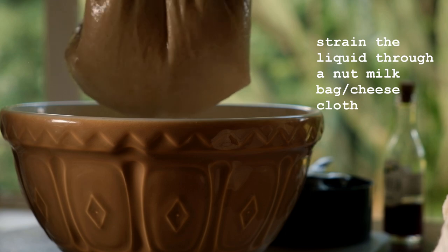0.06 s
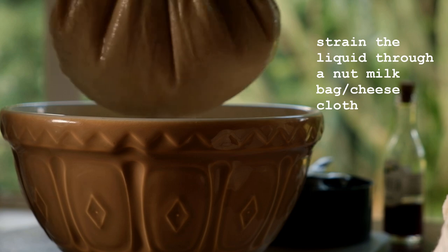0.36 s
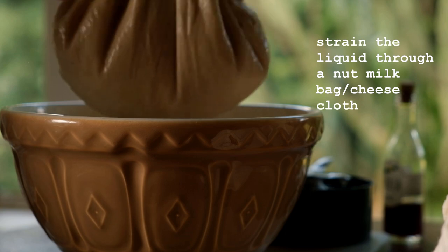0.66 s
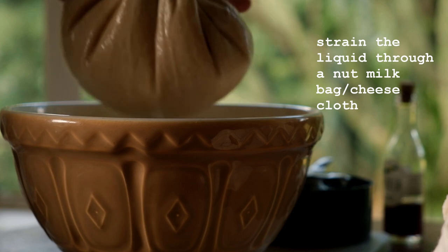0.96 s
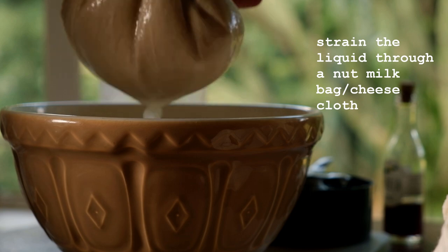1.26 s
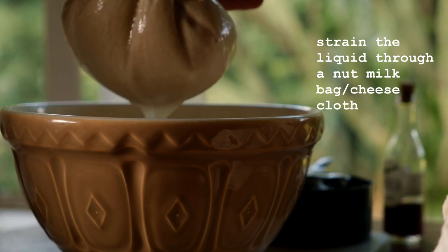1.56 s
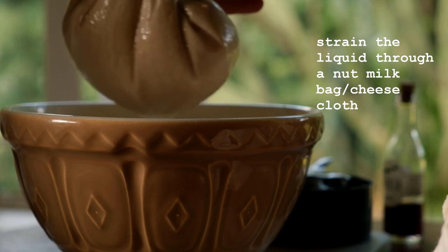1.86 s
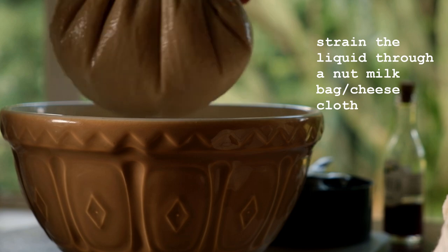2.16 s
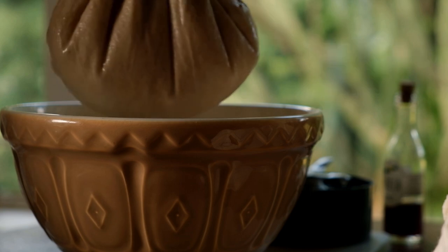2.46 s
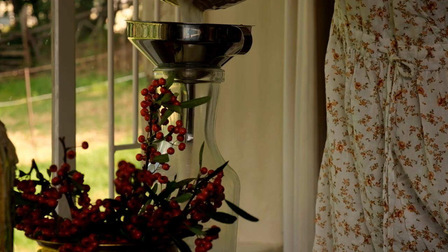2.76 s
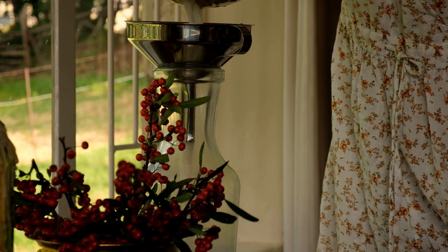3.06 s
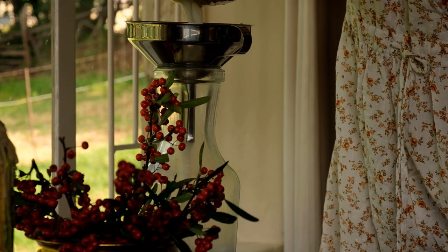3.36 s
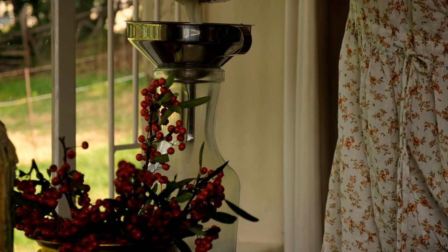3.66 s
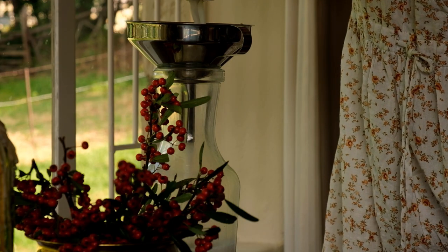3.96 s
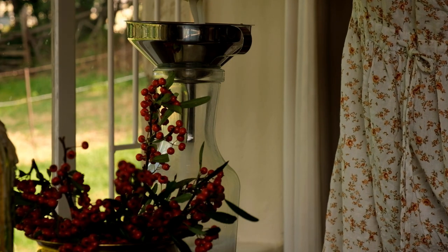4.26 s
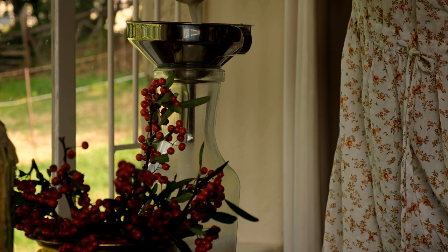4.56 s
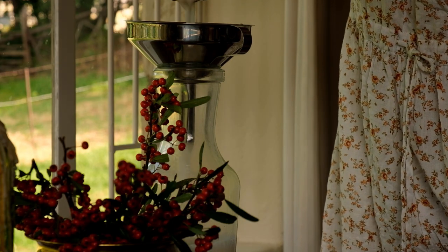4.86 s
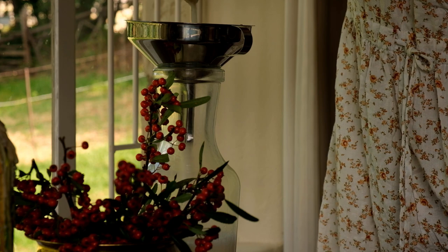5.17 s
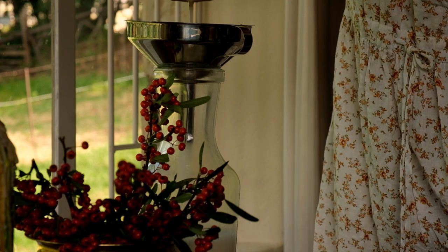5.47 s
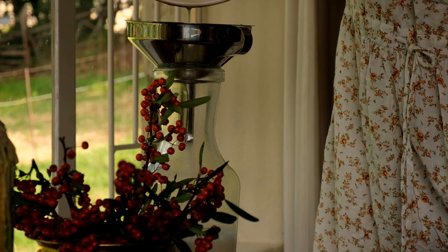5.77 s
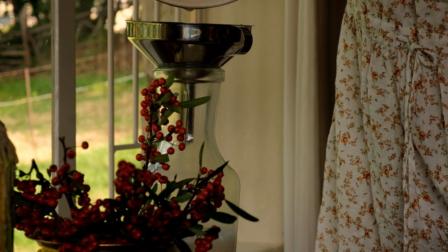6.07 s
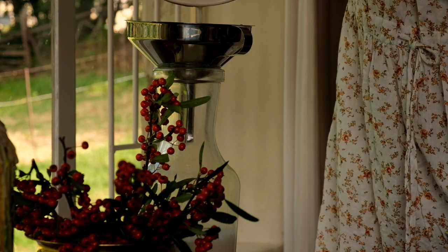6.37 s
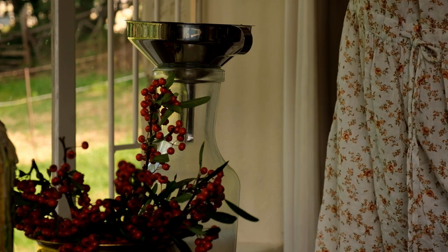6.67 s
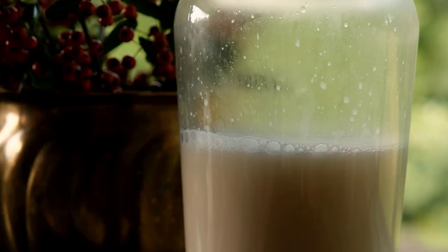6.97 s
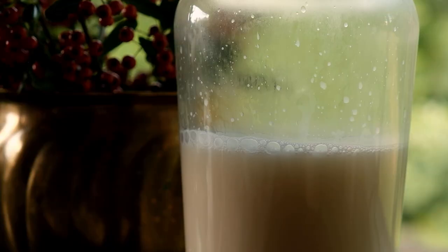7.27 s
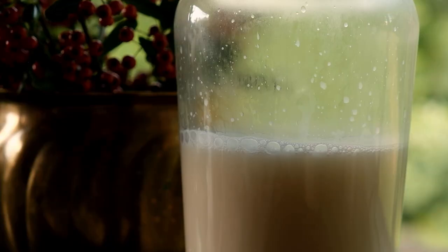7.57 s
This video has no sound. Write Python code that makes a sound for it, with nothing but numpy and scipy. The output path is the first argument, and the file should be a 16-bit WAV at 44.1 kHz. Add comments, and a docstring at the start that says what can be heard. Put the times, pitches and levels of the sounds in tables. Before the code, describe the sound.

Milk drips and squelches from a wrung cloth bag into a bowl, then gurgles through a funnel into a bottle and stops abruptly.

```python
"""Drops plink into a ceramic bowl and wet cloth squelches, close by, as nut milk is wrung from a bag.
Then the milk is poured through a steel funnel into a glass bottle: trapped air gulps and small
bubbles fizz over a low rumble. The stream thins to a few last drops and stops abruptly,
leaving the microphone in a quiet kitchen with insects far outside."""
import sys
import numpy as np
from scipy import signal
from scipy.io import wavfile

SR = 44100
rng = np.random.default_rng(int(sys.argv[2]) if len(sys.argv) > 2 else 0)


def generate_wav(signal):
    """Clip the signal to [-1, 1] and save it as 16-bit WAV at the path in sys.argv[1]."""
    frames = np.transpose(np.atleast_2d(signal))
    scaled = np.clip(frames, -1, 1) * 32767
    pcm = np.round(scaled).astype(np.int16)
    wavfile.write(sys.argv[1], SR, pcm)


N = 340011
TIME = np.arange(N) / SR
POUR_START_S, POUR_END_S = 2.66, 6.903
CUTOFF_HZ, SQUISH_HZ = 16000, 3670

# Big gulps of air dragged under in the funnel. Each row: start in seconds, level in dB,
# pitch of the air pocket in Hz, extra ring of the bare steel in dB.
GULPS = [(2.684, -26, 187, 12.5), (2.751, -31.5, 223, 17.5), (2.853, -35.5, 164, 19),
         (2.949, -30, 160, 15.5), (3.157, -25.5, 523, 3.5), (3.253, -22.5, 163, 4), (3.368, -19.5, 335, 0),
         (3.5, -24, 370, 12), (3.522, -39, 1000, 16), (3.568, -23.5, 534, 6.5), (3.652, -29, 497, -3),
         (3.778, -29.5, 169, -3), (3.852, -21.5, 290, 3.5), (3.954, -18, 561, -2.5), (4.003, -22, 222, 1),
         (4.117, -28.5, 507, -5), (4.169, -24, 500, -5), (4.241, -19, 536, -23), (4.321, -24, 513, -19),
         (4.386, -20, 567, -3), (4.455, -24, 537, -7), (4.662, -25.5, 544, -4), (4.696, -31, 375, 8),
         (4.883, -29.5, 527, -14), (4.958, -24.5, 370, 9.5), (5.22, -21.5, 422, 4),
         (5.255, -20.5, 457, -10), (5.314, -22, 510, -4), (5.346, -26.5, 482, 2), (5.677, -29.5, 527, -14),
         (5.838, -33, 530, 6.5)]
# The course of the pour. Each row: time in seconds, churning level in dB, fizz level in dB.
POUR_LEVELS = [(2.66, -48.5, -57.5), (3.13, -54.5, -52.5), (3.5, -45.5, -63.5), (3.95, -50.5, -53.5),
               (4.4, -45.5, -53.5), (4.75, -49.5, -56.5), (5.1, -46, -53), (5.53, -46, -52),
               (5.66, -51, -60), (5.82, -42.5, -65), (6.05, -63, -65.5), (6.9, -63.5, -69.5)]
# Steady hollow resonances ringing under the pour and last drops.
# Each row: pitch in Hz, level in dB, time to fall 60 dB in seconds.
HOLLOW_MODES = [(242.2, -0.5, 0.35), (333, -0.5, 0.12), (469, -13, 0.17), (530.6, -11.5, 0.15)]


def from_db(db):
    """Decibels to gain."""
    return 10 ** (np.asarray(db) / 20)


def unit_rms(x):
    """Scale to unit power."""
    return x / np.sqrt(np.mean(x ** 2) + 1e-20)


def gains(rows):
    """One gain curve over time for each dB column of a table."""
    times, *columns = np.transpose(rows)
    return [from_db(np.interp(TIME, times, db)) for db in columns]


def db_at(spectrum, hz):
    """Read a spectrum on a log-frequency axis."""
    known_hz, db = np.transpose(spectrum)
    return np.interp(np.log(hz), np.log(known_hz), db)


def band(x, edges_hz, kind="band"):
    """Gentle Butterworth filter."""
    sos = signal.butter(2, np.minimum(edges_hz, .45 * SR), kind, fs=SR, output="sos")
    return signal.sosfilt(sos, x + 1e-18)


def add(out, start_s, sound):
    """Mix a short sound in at a given time."""
    i = max(round(start_s * SR), 0)
    out[i:i + len(sound)] += sound[:N - i]


def ping(hz, t60, rise_s, glide=0, samples=SR // 10):
    """A damped sine that swells briefly; its pitch climbs by `glide` times `hz` each second."""
    t = TIME[:samples]
    tone = np.sin(2 * np.pi * hz * t * (1 + glide * t / 2))
    return tone * from_db(-60 * t / t60) * (1 - np.exp(-t / rise_s))


def background():
    """Room tone and a thin band of far insects, both louder until the pour ends; a drone under the pour."""
    # Room tone. Each row: frequency in Hz, relative level in dB.
    spectrum = [(25, 0), (160, -11.5), (820, -12), (1700, -23.5), (2550, -10), (3100, -24), (16000, -37)]
    tone, edges = 0, np.geomspace(20, CUTOFF_HZ, 20)
    for low, high in zip(edges, edges[1:]):
        mid, side = band(rng.standard_normal((2, N)), [low, high])
        stereo = mid + from_db(-1.5) * side * [[1], [-1]]
        tone = tone + from_db(db_at(spectrum, np.sqrt(low * high))) * stereo
    insects = unit_rms(band(rng.standard_normal((2, N)), [2440, 2620]))
    stages = [TIME < POUR_START_S, TIME < POUR_END_S]
    tone_db = np.select(stages, [-57, -55], -68)
    insects_db = np.select(stages, [-64, -61], -77)
    # Low rumble. Each row: time in seconds, level in dB.
    rumble_levels = [(2.66, -53.5), (5.1, -49.5), (6.25, -51), (6.35, -60)]
    waver = 0.48 * unit_rms(band(rng.standard_normal(N), [34, 52]))
    drone = np.sin(2 * np.pi * 42 * TIME) + waver
    rumble = gains(rumble_levels)[0] * drone * (TIME > POUR_START_S) * (TIME < POUR_END_S)
    return from_db(tone_db) * unit_rms(tone) + from_db(insects_db) * insects + rumble


def kitchen(x, scatter_db, room_db, room_t60, wide_hz):
    """The microphone hears direct sound, near echoes, treble scattered by curved walls and a room tail."""
    # Echoes off the vessel's wall and the worktop. Each row: delay in seconds, level in dB.
    echoes = [(.0083, -12), (0.0144, -16)]
    t = TIME[:SR // 2]
    mid, side = rng.standard_normal((2, len(t))) * from_db(-60 * t / room_t60) * (t > echoes[0][0] / 2)
    width = band(side, wide_hz, "high") * [[1], [-1]]   # the bass stays centred
    tail = from_db(room_db) * (mid + width) / np.linalg.norm(mid)
    burst = rng.standard_normal((2, len(t))) * from_db(-60 * t / 0.021) * (t > .0015)
    scatter = from_db(scatter_db) * band(burst, wide_hz, "high") / np.linalg.norm(burst[0])
    near = np.zeros(len(t))
    near[0] = 1
    for delay_s, db in echoes:
        near[round(delay_s * SR)] += from_db(db)
    return signal.fftconvolve(np.atleast_2d(x), tail + scatter + near, axes=1)[:, :N]


def hollow(x, modes):
    """Steady resonances ring on after a sound and give it a hollow colour."""
    response = 0
    for hz, db, t60 in modes:
        ring = ping(hz, t60, rise_s=1 / hz, samples=SR // 4)
        response = response + from_db(db) * ring / np.abs(ring).sum()
    return x + signal.fftconvolve(x, response)[:N]


def splash(low_hz, high_hz, t60):
    """The brief spatter of a tearing film of liquid."""
    t = TIME[:SR // 10]
    noise = unit_rms(band(rng.standard_normal(len(t)), [low_hz, high_hz]))
    return noise * from_db(-60 * t / t60) * (1 - np.exp(-20 * t / t60))


def snap(hz):
    """A film of milk tears in the weave: a smack and squeak at its pitch, a broad crack, a faint thud."""
    smack = from_db(-3) * splash(hz / 1.2, hz * 1.2, t60=0.01)
    squeak = ping(hz, t60=.008, rise_s=.0002, glide=20)
    crack_db = -1.5 + 6 * min(np.log2(hz / SQUISH_HZ), 0)   # low snaps crack more softly
    crack = from_db(crack_db) * splash(3000, 11500, t60=0.0044)
    thud = from_db(-14.5) * splash(280, 1500, t60=0.0084)
    return smack + squeak + crack + thud


def cloth(run_gap_s=.011, run_fall=0.83, clicks_per_s=190, low_hz=1050, high_hz=4690):
    """Air and milk squeeze through the weave over the bowl: snaps, falling runs of them, wet crackle."""
    # The loudest bursts of air. Each row: start in seconds, level in dB, pitch in Hz.
    squelches = [(0.156, -29, 6650), (0.193, -22, 4180), (0.271, -24.5, 4450), (0.297, -27.5, 1440),
                 (0.504, -25, 3530), (0.645, -32, 2710), (0.979, -30, 4040), (1.043, -32.5, 3750),
                 (1.065, -28.5, 2670), (1.126, -29.5, 3740), (1.316, -34, 1990), (1.352, -30.5, 5370),
                 (1.427, -20, 8070), (1.447, -30, 8600), (1.471, -22.5, 3760), (1.56, -26, 3640),
                 (1.622, -25.5, 3610), (1.711, -23.5, 4480), (1.762, -28.5, 8500), (1.839, -30, 3680),
                 (1.848, -27, 4330), (1.868, -24, 4020), (2.032, -32.5, 8430), (2.172, -33.5, 11600),
                 (2.425, -33, 5540), (2.541, -24, 10330)]
    # Folds of cloth collapsing. Each row: start in seconds, level in dB.
    folds = [(0.669, -36.5), (0.905, -34.5), (1.281, -30)]
    # Uneven wringing. Each row: time in seconds, crackle level in dB.
    squeezes = [(0.0, -54), (0.3, -48), (0.78, -55), (0.95, -53), (1.2, -53), (1.5, -55), (2.66, -51)]
    snaps, crackle = np.zeros((2, N))
    for start, db, hz in squelches:
        add(snaps, start, from_db(db) * snap(hz))
    for start, db in folds:
        for k, (late, size, detune) in enumerate(rng.random((6, 3))):
            hz = SQUISH_HZ * run_fall ** k * 2 ** (detune - .5)
            add(snaps, start + run_gap_s * (k + late), from_db(db) * (.5 + size) * snap(hz))
    for when, size, pitch in rng.random((int(clicks_per_s * POUR_START_S), 3)):
        hz = low_hz * (high_hz / low_hz) ** pitch
        add(crackle, when * POUR_START_S, from_db(20 * size ** 3) * snap(hz))
    # Air resonances of the bowl. Each row: pitch in Hz, level in dB, time to fall 60 dB in seconds.
    bowl_modes = [(318.5, 22.5, 0.22), (1010, 16.5, 0.043)]
    return hollow(snaps + gains(squeezes)[0] * crackle, bowl_modes) * (TIME < POUR_START_S)


def plink(hz):
    """A drop hits with a wet tick and traps a bubble that rings briefly and rises in pitch."""
    damping, climb = .5 + rng.random(2)
    bubble = ping(hz, t60=0.046 * np.sqrt(damping), rise_s=0.00075, glide=11 * climb)
    return bubble + from_db(-13) * splash(1300, 5100, t60=0.012)


def drips():
    """Drops fall into the bowl; each flings a small droplet that lands a moment later."""
    # Each row: start in seconds, level in dB, bubble pitch in Hz.
    drops = [(0.025, -25.5, 890), (0.072, -21, 788), (0.103, -34, 750), (0.235, -24.5, 805),
             (0.622, -23.5, 740), (0.773, -33.5, 920), (0.814, -29, 902), (1.438, -23.5, 852),
             (1.525, -20, 860), (1.578, -19.5, 832), (1.608, -22, 868), (1.668, -32, 854),
             (1.751, -28.5, 830), (1.797, -27.5, 880), (1.924, -24.5, 744), (1.97, -34, 684),
             (1.998, -21.5, 779), (2.115, -27.5, 862), (2.29, -29, 900), (2.403, -31.5, 937),
             (2.656, -25.5, 980)]
    out = np.zeros(N)
    for start, db, hz in drops:
        add(out, start, from_db(db) * plink(hz))
    for start, _, _ in drops:
        late, size = rng.random(2)
        droplet = from_db(-35) * (.5 + size) * plink(hz=1000 - 200 * size)
        add(out, start + .03 * (.5 + late), droplet)
    return out


def bubbles(spectrum, per_s, cycles, spread_db):
    """A steady cloud of random bubbles, each with its own size, damping and pitch."""
    out = np.zeros(N)
    low, high = spectrum[0][0], min(spectrum[-1][0], CUTOFF_HZ)
    for when, pitch, size, ring in rng.random((int(per_s * N / SR), 4)):
        hz = low * (high / low) ** pitch
        t60 = cycles * (.5 + ring) / hz
        height = hz * from_db(db_at(spectrum, hz) + spread_db * size ** 2)   # brief bubbles peak higher
        add(out, when * N / SR, height * ping(hz, t60, rise_s=1 / hz, samples=int(t60 * SR)))
    return unit_rms(out)


def swarm(hz, length_s, octaves, scatter, count, cycles=13.2):
    """A quick run of bubbles whose pitch sweeps by `octaves` as the air pocket changes size."""
    out = np.zeros(SR // 2)
    for k, (late, detune) in enumerate(rng.random((count, 2))):
        progress = (k + late) / count
        pitch = hz * 2 ** (octaves * progress + scatter * (detune - .5))
        add(out, progress * length_s, ping(pitch, t60=cycles / pitch, rise_s=1 / pitch))
    return out


def last_drops(patter_hz=1740):
    """The funnel drains with a rising gurgle and a dribble; drops plop into the bottle amid bubbles."""
    # Each row: start in seconds, level in dB, bubble pitch in Hz.
    drops = [(6.281, -31, 1030), (6.357, -32.5, 1060), (6.419, -36, 1020), (6.536, -39, 868),
             (6.601, -33, 1048), (6.627, -32, 1090), (6.736, -25.5, 1275), (6.769, -32.5, 1066),
             (6.774, -41, 2180), (6.861, -44, 2194), (6.878, -40.5, 1098)]
    out = np.zeros(N)
    add(out, 6.155, from_db(-34) * swarm(536, length_s=0.09, octaves=0.75, scatter=0.32, count=16))
    add(out, 6.17, from_db(-37.5) * swarm(patter_hz, length_s=0.14, octaves=0.32, scatter=0.57, count=16))
    for start, db, hz in drops:
        add(out, start, from_db(db) * ping(hz, t60=0.075, rise_s=0.0012, glide=1.86))
        patter = swarm(patter_hz, length_s=0.02, octaves=0, scatter=0.97, count=10)
        add(out, start, from_db(db - 9) * patter)
        splash_db = 29 + 2.044 * db   # only heavy drops splash much
        add(out, start, from_db(splash_db) * splash(416, 1290, t60=0.038))
    return hollow(out, HOLLOW_MODES)


def spray(per_s, decay_s):
    """Tiny films burst in bright puffs, spread wide between left and right."""
    onsets = 1. * (rng.random(N) < per_s / SR)
    puffs = signal.lfilter([1], [1, -np.exp(-1 / (decay_s * SR))], onsets)
    return unit_rms(band(rng.standard_normal((2, N)) * puffs, [2500, 13000]))


def fizz():
    """Small bubbles burst on the froth in bunches, with lulls between."""
    # Each row: bubble pitch in Hz, relative level in dB.
    spectrum = [(1300, 7), (2400, 3.5), (5000, 1.5), (6800, -10.5), (11000, -6.5), (15500, -21.5)]
    froth = from_db(-3) * bubbles(spectrum, per_s=1200, cycles=29, spread_db=24)
    mist = from_db(-12) * spray(per_s=60, decay_s=0.012)
    bunching_db = 3.5 * unit_rms(band(rng.standard_normal(N), 29, "low")).clip(-2, 2)
    return from_db(bunching_db) * (froth + mist)


def thump(pocket_hz, steel_db, steel_hz=700, db_per_octave=5.5):
    """An air pocket rings the funnel's pool, most near its own pitch; bare steel lifts the upper modes."""
    # The funnel and its pool. Each row: pitch in Hz, level in dB, time to fall 60 dB in seconds.
    modes = [(164.2, 0.5, 0.092), (258.4, -6.5, 0.13), (369, 0, 0.029), (535, 3, 0.063), (822, -3, 0.03),
             (1025, -3.5, 0.039)]
    out = 0
    for k, (hz, db, t60) in enumerate(modes):
        level_db = db - db_per_octave * abs(np.log2(hz / pocket_hz)) + steel_db * (hz > steel_hz)
        ring = ping(hz * rng.normal(1, 0.025), t60, rise_s=0.0021, samples=SR // 4)
        out = out + from_db(level_db) * ring * (-1) ** k
    return out


def gulps(churn_gain, small_gap_s=.034):
    """The stream drags air under in pulses: big ringing gulps over a quick uneven run of small ones."""
    big, small = np.zeros((2, N))
    for start, db, pocket_hz, steel_db in GULPS:
        pocket = from_db(-8.5) * ping(pocket_hz, t60=0.078, rise_s=0.00072, glide=6, samples=SR // 4)
        add(big, start, from_db(db) * (thump(pocket_hz, steel_db) + pocket))
    starts = np.arange(POUR_START_S, POUR_END_S, small_gap_s)
    for start, (late, size, pitch) in zip(starts, rng.random((len(starts), 3))):
        gulp = from_db(7.5 + 7 * size) * thump(pocket_hz=347 * 2 ** pitch, steel_db=0)
        add(small, start + small_gap_s * late, gulp)
    return band(big + small * churn_gain, 102, "high")


def pour():
    """Large bubbles churn and gulp in the funnel; small ones fizz, pop and spurt after each big gulp."""
    # Churning. Each row: bubble pitch in Hz, relative level in dB.
    churn_spectrum = [(140, -12.5), (330, -4), (540, -4.5), (1050, -3.5), (1500, -20.5)]
    # Single bubbles bursting on the froth. Each row: start in seconds, level in dB, pitch in Hz.
    pops = [(3.299, -30, 4980), (4.402, -28.5, 3130), (5.34, -39, 5440)]
    churn_gain, fizz_gain = gains(POUR_LEVELS)
    churn = churn_gain * bubbles(churn_spectrum, per_s=400, cycles=15, spread_db=13)
    out = hollow(gulps(churn_gain) + churn, HOLLOW_MODES)
    for start, db, hz in pops:
        add(out, start, from_db(db) * ping(hz, t60=0.012, rise_s=0.00013))
    for start, db, _, _ in GULPS:
        spurt = swarm(2230, length_s=0.04, octaves=0.94, scatter=1.6, count=14)
        add(out, start, from_db(db - 23) * spurt)
    return (out + fizz_gain * fizz()) * (TIME > POUR_START_S)


def scene():
    """Close up on the worktop: the bowl first, then the funnel, whose sound ends all at once."""
    bowl = kitchen(drips() + cloth(), scatter_db=-0.5, room_db=-10.5, room_t60=0.58, wide_hz=2330)
    funnel = kitchen(last_drops() + pour(), scatter_db=5.5, room_db=-9, room_t60=0.29, wide_hz=1940)
    return bowl + funnel * (TIME < POUR_END_S) + background()


def record(dry):
    """A stereo microphone, a little louder and brighter on the left; the top is cut."""
    coloured = dry * from_db([[.2], [-.2]]) + band(dry, 1800, "high") * [[.1], [-.1]]
    return signal.sosfilt(signal.ellip(10, .1, 70, CUTOFF_HZ, fs=SR, output="sos"), coloured)


dry = scene()
out = record(dry)
generate_wav(out)
```